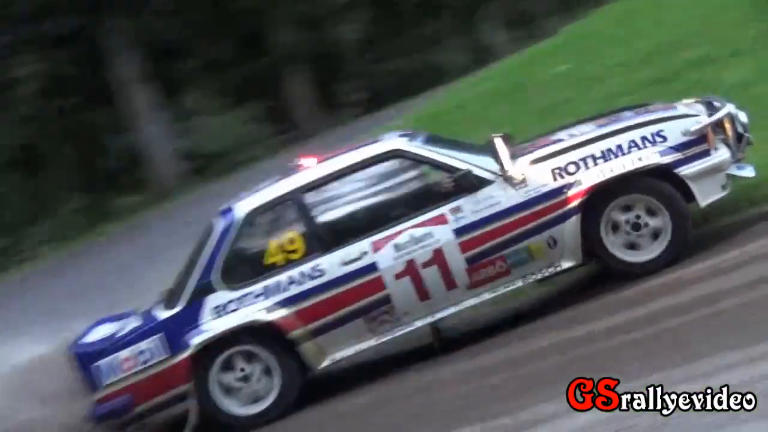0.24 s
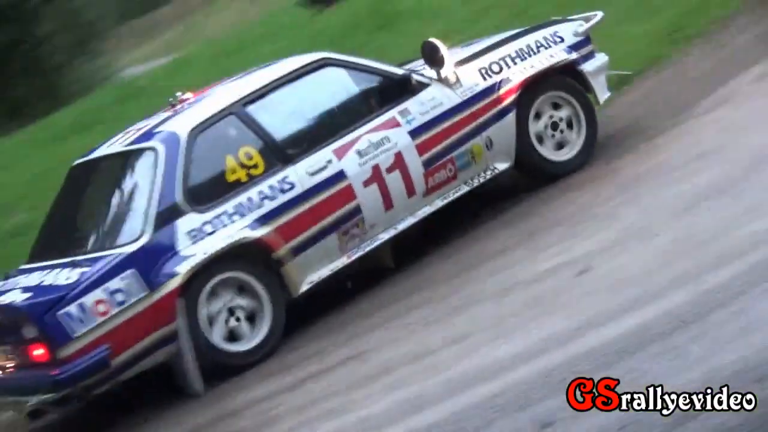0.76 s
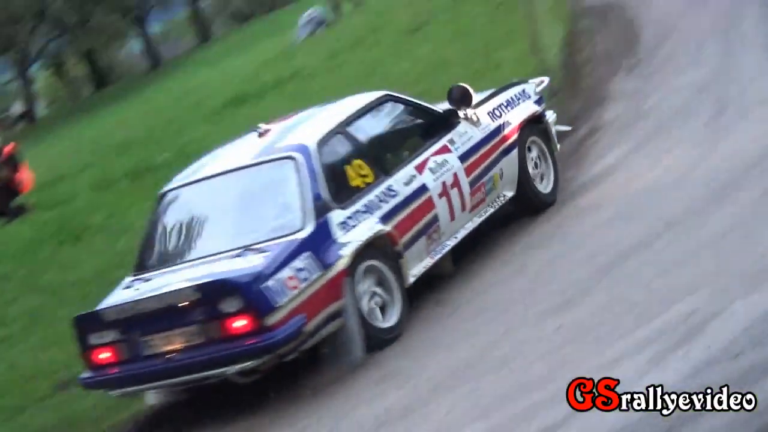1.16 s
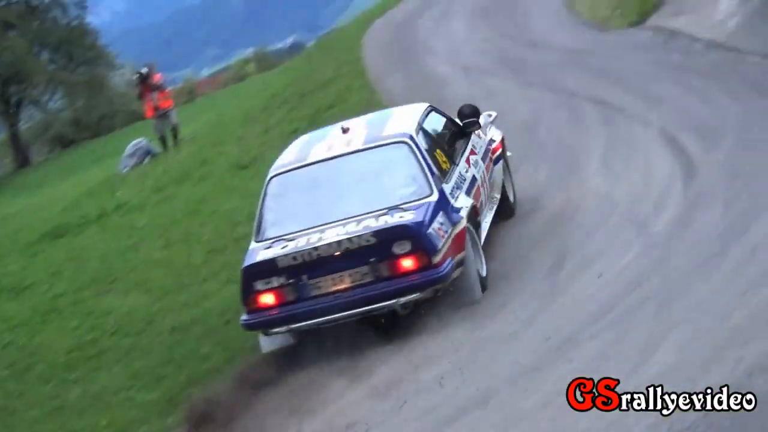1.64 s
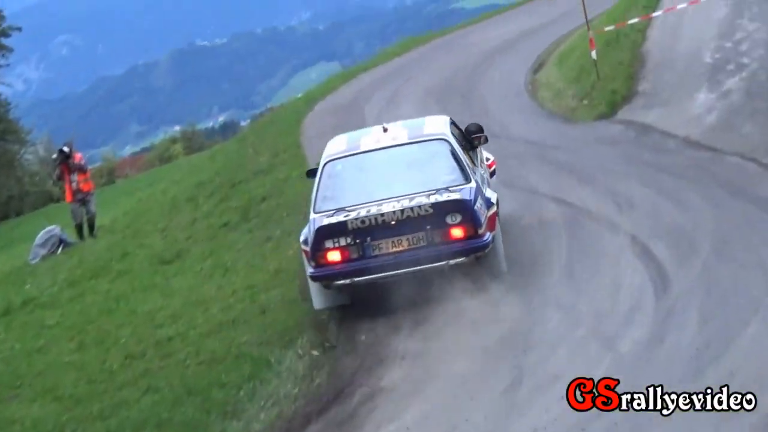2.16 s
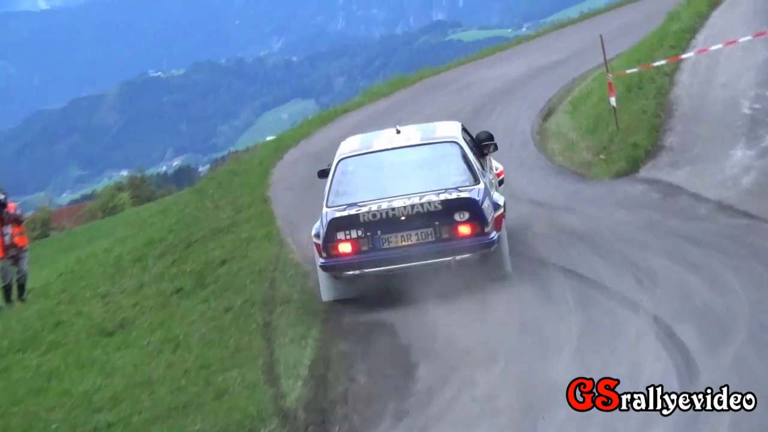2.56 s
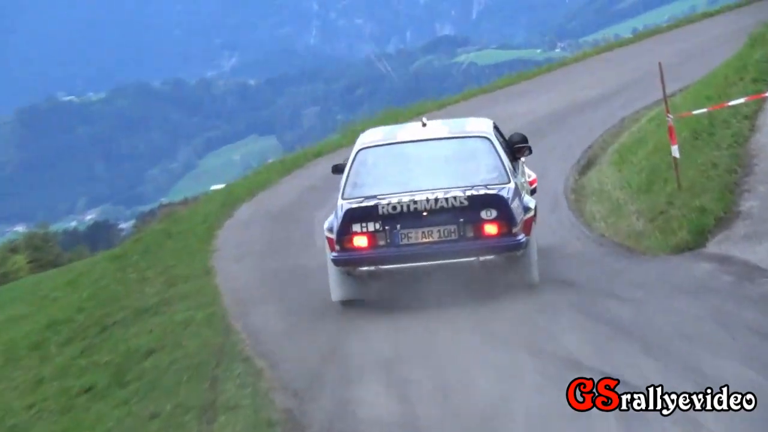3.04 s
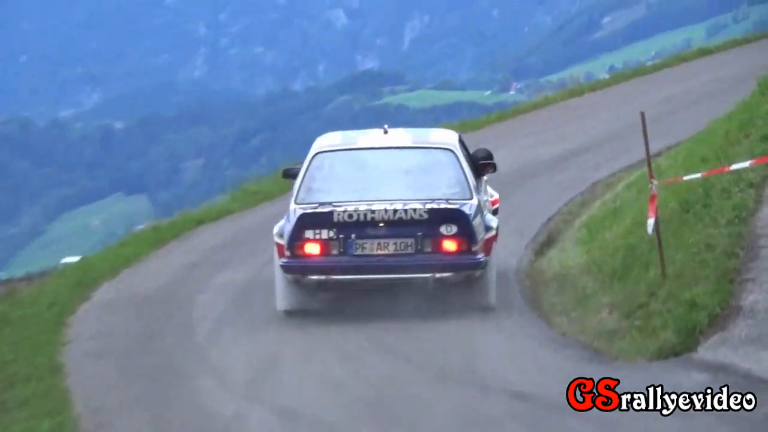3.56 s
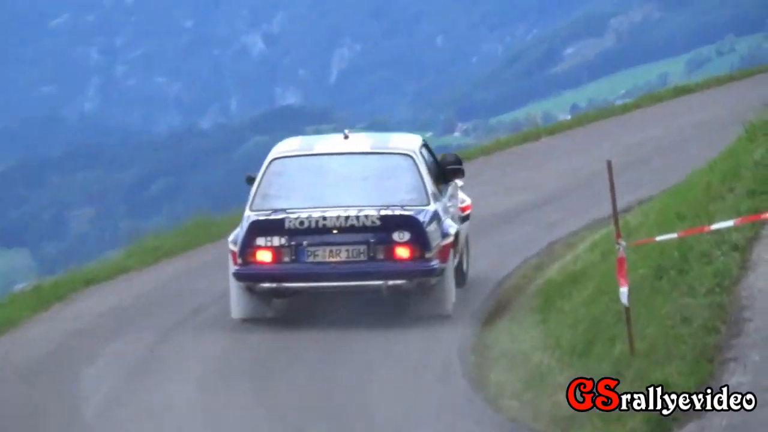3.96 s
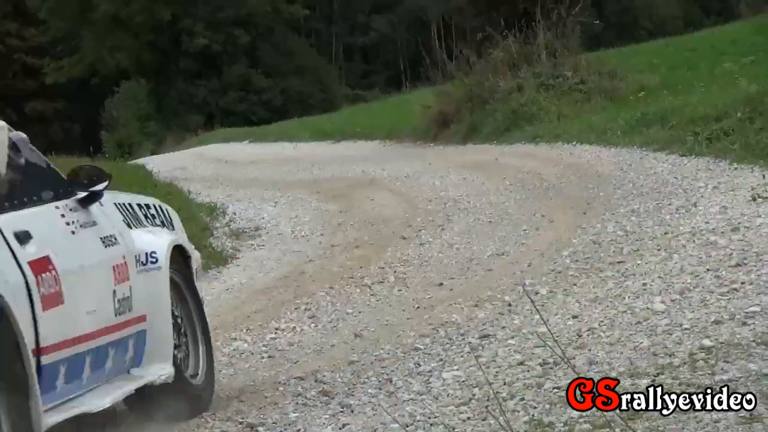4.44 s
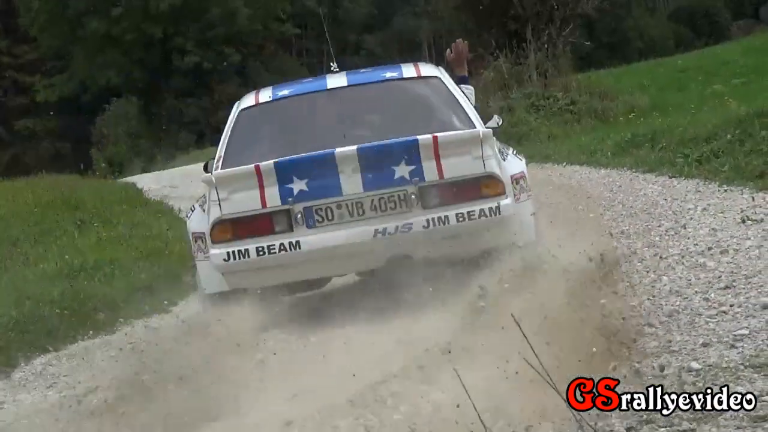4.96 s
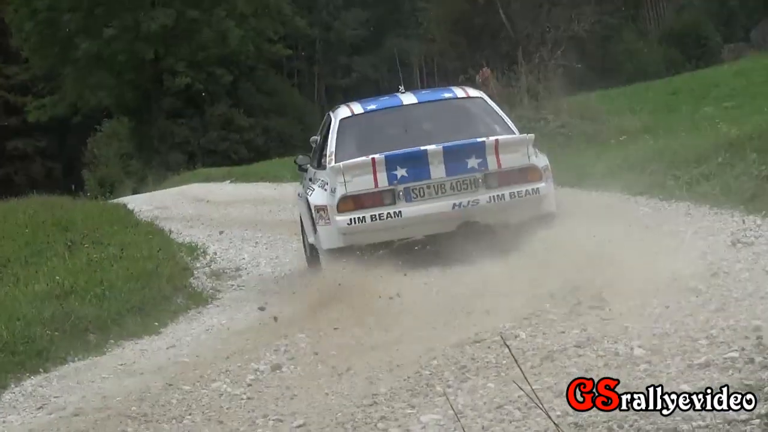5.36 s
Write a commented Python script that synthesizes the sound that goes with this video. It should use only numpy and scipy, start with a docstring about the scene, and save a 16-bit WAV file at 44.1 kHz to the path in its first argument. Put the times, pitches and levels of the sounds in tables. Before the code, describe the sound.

Outdoors, close to the roadside. From 0 s a four-cylinder rally engine at full load blares past, raspy and uneven, over dusty tyre scrub. Its pitch dips early, climbs until about 0.5 s, then drops in a brief throttle stumble with a thump near 0.6 s. Tyre hiss swells around 1.2 s; small stones tick. Revs flare near 1.5 s and sag by 2 s as the car turns away, the hiss thinning. From 1.9 to 3 s the exhaust stutters with dense, dull pops and bangs. Then the note climbs steadily, buzzing with a slight lope around 4 s, and fades almost away by 4.5 s. A hard cut at 4.52 s: a second engine, close, its revs falling until 4.8 s amid bright stone ticks and gritty spray. Heavy thumps at 4.8-4.9 s, then a smooth, strong hum surges upward until 5.4 s, easing with final pops by 5.6 s.

```python
"""Two four-cylinder rally engines at full chat, close to a microphone at the roadside. The first car slides out of a
tarmac hairpin, tyres scrubbing, stumbles and pulls away until it fades; after a hard cut a second powers out
of a gravel bend and sprays stones. Engines are sums of orders that vary firing by firing, with noise for the roar
in the pipe and the gas rasp. Bangs and thumps ring the pipe, grains of noise make the tyres, ticks make the stones;
the verge returns a faint echo and low noise makes the rumble."""
import sys
import numpy as np
from scipy import signal
from scipy.fft import rfft, irfft
from scipy.io import wavfile
from scipy.ndimage import uniform_filter1d

SR = 44100
rng = np.random.default_rng(int(sys.argv[2]) if len(sys.argv) > 2 else 0)


def wrap_up_sound(samples):
    """Save the sound to the file named by the first command line argument, as 16-bit audio."""
    columns = np.atleast_2d(samples).T
    # keep every value between -1 and 1, then stretch to whole-number steps
    tamed = np.clip(columns, -1, 1)
    steps = np.round(tamed * 32767).astype(np.int16)
    wavfile.write(sys.argv[1], SR, steps)


N = 246959
CUT_S = 4.517

# Bangs and thumps of the engine, most with a dip just before: t/s, bang level/dB, thump level/dB,
# engine dip/dB (values above 0 count as 0)
BANGS = [(0.615, -43, -11.5, 1.5), (1.496, -24, -14, -3), (1.579, -28, -44, 0), (1.872, -27.5, -37, -8),
         (1.910, -29, -27, -3.5), (2.189, -25.5, -11, -10), (2.228, -53, -40, -16.5), (2.273, -41, -32, -8),
         (2.35, -38, -26, -2.5), (2.439, -42.5, -35, -4.5), (2.498, -35.5, -40, -11.5),
         (2.586, -30.5, -38, -2), (2.631, -31.5, -21, -13), (2.672, -53, -31, -4.5), (2.72, -42, -32, -3.5),
         (2.761, -33.5, -28, -8), (2.785, -33.5, -32, -5), (2.803, -29.5, -18, -5.5), (2.859, -44, -33, -3),
         (2.931, -43.5, -22, -4), (3.017, -34.5, -47, -2.5), (3.068, -34.5, -40, 0),
         (3.195, -38.5, -30.5, -7), (3.336, -43.5, -29, -1.5), (3.408, -46, -30, -4.5),
         (3.55, -38, -31, -2), (3.63, -40, -32, -2.5), (3.719, -30.5, -23.5, -3), (3.862, -44, -30, 0),
         (4.812, -59, -9, -1), (4.862, -59, -17, -1), (4.886, -53, -6, -5), (5.472, -35, -16.5, 0),
         (5.504, -53, -20, 0.5), (5.554, -29, -9.5, -4.5)]
# When each car is last side-on, close behind view, far behind view: t/s
TURNING_AWAY = {"tarmac": (1.24, 1.6, 3.38), "gravel": (4.66, 4.93, 5.64)}


def tarmac_car():
    """First car: a strong first order, and tyres that scrub on dusty tarmac."""
    # Engine: t/s, base order f/Hz, then level/dB of first order, second order, orders 3 and 4,
    # roar in the pipe, gas rasp, half orders
    engine = [(0.02, 124.8, -25, -42, -59, -28.5, -36, -46),
              (0.12, 111.5, -19, -44, -35.5, -25.5, -40, -42),
              (0.16, 108.4, -24, -31, -34.5, -31.5, -56, -24),
              (0.29, 128.4, -21, -28, -30.5, -31.5, -41.5, -37),
              (0.38, 131.3, -50, -20.5, -28.5, -30.5, -44.5, -41),
              (0.45, 133.5, -24, -31.5, -32, -30.5, -37.5, -20.5),
              (0.51, 136.2, -29, -24, -29, -31, -53, -41), (0.535, 135.5, -25, -31, -31, -32.5, -40, -35),
              (0.555, 132, -30, -50, -53, -32, -36, -42), (0.6, 124.0, -27, -50, -54, -30, -40, -44),
              (0.618, 114, -32, -39, -21.5, -30.5, -47, -35),
              (0.64, 114.9, -20.5, -34.5, -30, -32, -40, -18),
              (0.75, 124.6, -21.5, -31, -34.5, -34, -45, -39),
              (0.82, 125.4, -27.5, -35, -36.5, -33, -47, -54),
              (0.89, 124.6, -28, -34.5, -34, -36.5, -53, -37),
              (1.0, 128.3, -31.5, -28, -31.5, -30.5, -45, -27),
              (1.1, 119.8, -29.5, -30.5, -35, -32, -44, -27), (1.17, 119.8, -25, -29.5, -34, -37, -63, -36),
              (1.22, 123.3, -22.5, -48, -32, -28, -57, -47), (1.3, 121.3, -24.5, -36, -32, -38, -48, -21),
              (1.37, 115.6, -21.5, -38, -28, -32.5, -39.5, -19),
              (1.4, 119.9, -18, -37, -30, -33.5, -66, -56), (1.48, 135.7, -23, -23, -38, -35.5, -41.5, -22),
              (1.55, 139.6, -20.5, -26.5, -32.5, -38, -47, -30),
              (1.73, 134.4, -19.5, -27.5, -39, -38.5, -49.5, -35),
              (1.86, 121.5, -24, -24, -36.5, -39, -52, -24),
              (1.96, 116.3, -21.5, -38, -39.5, -44.5, -69, -31),
              (2.09, 122.9, -22, -27, -39.5, -44.5, -53, -30),
              (2.15, 122.5, -22, -22.5, -33.5, -39.5, -55, -32),
              (2.24, 122.0, -22.5, -35.5, -35.5, -39, -52, -18.5),
              (2.32, 118.7, -21.5, -29.5, -36, -40.5, -54, -27),
              (2.4, 120.4, -21.5, -28, -46, -42.5, -62, -27),
              (2.43, 121.3, -20.5, -26, -34.5, -41.5, -52.5, -29.5),
              (2.53, 121.0, -24, -25.5, -39, -41.5, -51, -25),
              (2.6, 122.5, -21.5, -25.5, -35.5, -41, -53, -28),
              (2.72, 126.0, -26, -22.5, -35.5, -38.5, -49, -27),
              (2.81, 123.7, -25, -24.5, -31.5, -38.5, -46, -23.5),
              (2.87, 127.7, -27.5, -22.5, -38.5, -39.5, -53.5, -29),
              (2.92, 130.0, -21.5, -26, -32.5, -35, -52, -27.5),
              (2.99, 128.3, -27, -21.5, -40, -42.5, -54, -25),
              (3.15, 133.6, -20.5, -26.5, -34.5, -38, -52, -31),
              (3.4, 139.8, -23, -27, -36, -40.5, -52, -27),
              (3.64, 147.6, -22, -27.5, -42.5, -44, -50.5, -26.5),
              (3.88, 155.7, -25.5, -21.5, -37.5, -45, -50.5, -23),
              (4.09, 163.3, -26, -24, -37, -38, -49.5, -23.5),
              (4.34, 173.2, -34.5, -31, -44.5, -47.5, -51, -30.5),
              (4.43, 178.5, -40, -35, -46, -52, -56.5, -37), (4.47, 180, -45.5, -39.5, -53, -58, -60, -47),
              (4.5, 181.1, -55, -55, -63, -77, -66, -60)]
    # What the exhaust does to orders 3 to 14: f/Hz, level/dB beside the car, close behind, far behind
    exhaust = [(317, 2.5, 4.5, 6), (392, 0.5, 6, 8.5), (465.5, -7, -5, 2.5), (499.7, 3, -0.5, -13),
               (544, -19, -1, -18), (611, -12, -11, -15.5), (692, -2, -31, 0.5), (760, -11.5, -7, -3),
               (817, -7, -6.5, -9), (875, -17.5, -10, -15), (968, -15, -4, -19), (1034, -24, -13.5, -31.5),
               (1110, -21.5, -14.5, -34.5), (1210, -21, -19.5, -31.5), (1370, -33, -23, -17.5),
               (1520, -48, -25.5, -28), (2180, -36, -30.5, -32.5)]
    # Half orders of unequal cylinders: order, relative level/dB
    uneven = [(.5, -19), (1.5, -14.5), (2.5, -7.5), (4.5, -22)]
    # Treble hiss, tyres at first, then a faint steady hiss: t/s, level/dB
    hiss_levels = [(0, -40.5), (.12, -39.5), (.25, -45), (1, -44), (1.1, -41.5), (1.19, -38.5), (1.24, -43),
                   (1.41, -42), (1.46, -51.5), (1.7, -51), (2, -55), (2.301, -62.5), (2.6, -76.5),
                   (4.3, -66), (4.5, -73.5)]
    # Rubber on dusty tarmac: f/Hz, relative level/dB per Hz
    scrub = [(100, -43), (170, 21.5), (450, 23), (900, 15), (1300, 9), (2000, 4.5), (3500, 1), (5900, -5),
             (7900, -0.5), (9600, 1), (12500, -7), (15500, -7), (17000, -17)]
    # Pipe modes: f/Hz, nominal width/Hz, relative level/dB
    pipe_modes = [(514, 200, 4), (786, 156, 8), (841, 260, 10.5), (1418, 220, 3.5)]
    # Scatter of firing strength: t/s, level/dB
    firing = [(0, 1.8), (.6, 1.5), (.75, 1.1), (1.2, 1.2), (1.32, 2.1), (1.5, 1.3), (1.8, 1.9), (2.1, 1.5),
              (2.25, 3.2), (2.42, 1.5), (2.65, 2.3), (2.8, 2.8), (3.1, 1.8), (3.3, 2), (3.55, 2.4),
              (3.8, 2.2), (3.95, .8), (4.5, .5)]
    return car(engine, TURNING_AWAY["tarmac"], exhaust, uneven, hiss_levels, scrub, pipe_modes, firing,
               odd_db=1.07, halves_db=-0.4, roar_db=-4.5, grit_db=2.5, patch_db=2.0,
               front_db=-8.5, behind_front_db=-3.0, behind_gas_db=0.0, count=1)


def gravel_car():
    """Second car: a strong second order, and tyres that fling stones."""
    # Engine: t/s, base order f/Hz, then level/dB of first order, second order, orders 3 and 4,
    # roar in the pipe, gas rasp, half orders
    engine = [(4.52, 121.5, -37, -23, -39.5, -40.5, -49, -31),
              (4.612, 110.6, -25.5, -26.5, -40.5, -46, -51.5, -44),
              (4.828, 91.85, -38, -29, -42, -53, -70, -27), (4.91, 96.37, -43, -23.5, -28, -46.5, -54, -23),
              (4.984, 105, -40.5, -20.5, -31, -49.5, -49.5, -28),
              (5.098, 117.7, -31, -16.5, -32.5, -49.5, -52, -30.5),
              (5.264, 128.3, -40.5, -16, -37, -57, -52, -31),
              (5.364, 132.5, -38, -16.5, -38, -50, -56, -31), (5.424, 132.1, -35, -19, -40, -57, -56, -27),
              (5.462, 127.6, -48, -18.5, -41, -53, -51.5, -25.5),
              (5.53, 123, -43, -18.5, -38, -50, -57, -21.5)]
    # What the exhaust does to orders 3 to 14: f/Hz, level/dB beside the car, close behind, far behind
    exhaust = [(293, 3, -8, 9), (407, 5, 6.5, 4), (545, -1, -0.5, -3), (648, -24, 12, 8.5),
               (770, -25, -5, -14), (880, -9, -6, -31), (960, -8, -18, -31), (1100, -21, -21, -33),
               (1400, -38, -12, -32), (1700, -35, -23, -33)]
    # Half orders of unequal cylinders: order, relative level/dB
    uneven = [(1.5, -1.5), (2.5, -4), (3.5, -10)]
    # Treble hiss of the tyres and their spray: t/s, level/dB
    hiss_levels = [(4.52, -42), (4.55, -38), (4.575, -48), (4.65, -41), (4.69, -41.5), (4.77, -43.5),
                   (4.79, -44), (4.81, -42.5), (4.87, -42), (4.925, -40), (4.945, -42), (5, -51.5),
                   (5.1, -50), (5.3, -57.5), (5.4, -50.5), (5.59, -53.5)]
    # Flung stones: f/Hz, relative level/dB per Hz
    spray = [(300, -36), (900, -12), (2500, -9), (4300, -5), (6000, -8), (8000, -0.5), (9600, 0.5),
             (11400, -1.5), (14000, -2.5), (15500, -8), (17000, -11)]
    # Pipe modes: f/Hz, nominal width/Hz, relative level/dB
    pipe_modes = [(617, 190, 9), (950, 200, 1), (1410, 230, -8)]
    # Scatter of firing strength: t/s, level/dB
    firing = [(4.52, .8), (4.75, .8), (4.85, 1.8), (4.95, .5), (5.4, .6), (5.5, 1.8)]
    return car(engine, TURNING_AWAY["gravel"], exhaust, uneven, hiss_levels, spray, pipe_modes, firing,
               odd_db=-7, halves_db=-4.5, roar_db=-2.5, grit_db=3, patch_db=4.5,
               front_db=-21, behind_front_db=-7, behind_gas_db=10.0, count=2)


def car(engine, turns_away_s, exhaust, uneven, hiss_levels, hiss_colour, pipe_modes, firing,
        odd_db, halves_db, roar_db, grit_db, patch_db, front_db, behind_front_db, behind_gas_db, count):
    """Engine orders, roar and rasp driven by uneven firings, plus hiss; count firings a base period."""
    # Left minus right: t/s, level/dB of first order, of the orders above it, of gas and hiss
    bearing = [(0.0, 6, 0.0, -0.5), (0.14, 1.5, -1.0, -0.5), (0.34, 3, -1.0, -0.5), (0.41, -3, -1.5, 0.5),
               (0.56, 5.5, 0.5, -1), (0.67, 2.0, 0.0, 0), (0.95, 4.5, 1.0, -0.5), (1.11, 3, 2.5, -0.5),
               (1.62, 1, -2.0, -1), (1.89, 0.5, -1.5, -2), (3.07, 2, -2.5, -3), (3.35, 2.5, -4.5, -3.5),
               (3.54, 2, -2.5, -1.5), (3.68, 4.5, -5.0, -3.5), (4.05, 1.5, -3.0, -0.5),
               (4.29, 0.5, -4.5, 2), (4.49, 5, -3.0, 0), (4.51, 7, 4.5, 3), (4.63, 1.5, 3.5, -1),
               (4.87, 2, 0.5, -0.5), (5.57, 1, -1.0, -1.0), (5.6, -1, -1.0, -2)]
    hz, first_db, second_db, low_db, pipe_db, rasp_db, half_db = columns(engine)
    first_pan_db, upper_pan_db, noise_pan_db = columns(bearing)
    scatter_db, = columns(firing)
    behind = np.interp(np.arange(N) / SR, turns_away_s, [0, .5, 1])
    late_per_db = .003  # scatter of firing time, in periods per dB of scatter in strength

    turns = np.cumsum(hz) / SR
    cycle = (turns + .5).astype(int)
    chance = rng.standard_normal((int(turns[-1]) + 2, 4))
    edge = int(SR / 500)
    # weak firings fall further than strong ones rise
    strength = np.minimum(chance[:, 0], .6)[cycle]
    size = uniform_filter1d(undb(scatter_db * strength), edge) * engine_dips()
    late = uniform_filter1d(late_per_db * scatter_db * chance[cycle, 1], edge)
    angle = 2 * np.pi * (turns - late)

    order_db = [first_db, second_db] + upper_order_levels(hz, low_db, pipe_db, exhaust, behind, odd_db)
    first, upper = order_lines(order_db, angle, size)
    halves = half_orders(uneven, half_db + halves_db, scatter_db, angle)

    since = (count * angle / (2 * np.pi)) % 1  # share of a firing period since the last firing
    front = -size * undb(2.0 * chance[cycle, 2]) * (np.diff(since, prepend=0) < -.5)
    puff = size * (.3 + np.exp(-since / .28))
    roar = pipe_roar(front, puff, undb(front_db + behind_front_db * behind), pipe_modes)
    gas = undb(pipe_db + roar_db + behind_gas_db * behind) * roar + undb(rasp_db) * gas_rasp(puff)
    noise = gas + tyre_hiss(hiss_levels, hiss_colour, grit_db, patch_db)

    sides = np.array([[.5], [-.5]])
    return (first * undb(sides * first_pan_db) + (upper + halves) * undb(sides * upper_pan_db)
            + noise * undb(sides * noise_pan_db))


def upper_order_levels(hz, low_db, pipe_db, exhaust, behind, odd_db):
    """Levels of orders 3 to 14, shaped by the exhaust as the view goes from beside to far behind."""
    # Clean upper orders against the roar: t/s, level/dB
    clean_lines = [(0, -9), (.2, -1), (.6, -1), (1, 2), (1.4, 0), (1.7, 3.5), (1.9, 0), (2.3, -1), (3, 0),
                   (3.6, 0), (4.4, 3.5), (4.52, 2), (4.65, -2), (4.9, 3), (5.2, -3.5), (5.6, 0.5)]
    upper_from = 5  # from this order up the lines rise and fall with the roar
    flutter_db, waver_db = 2, 1.8  # quick flutter of those orders, slower wander of every one here
    clean_db, = columns(clean_lines)
    shape_hz, *views_db = np.transpose(exhaust)
    shares = [np.clip(1 - 2 * abs(behind - view), 0, 1) for view in (0, .5, 1)]
    levels = []
    for k in range(3, 15):
        if k < upper_from:
            level_db = low_db
        else:
            level_db = pipe_db + clean_db + flutter_db * walk(30)
        shape_db = sum(share * np.interp(k * hz, shape_hz, db) for share, db in zip(shares, views_db))
        levels.append(level_db + shape_db + odd_db * (k % 2) + waver_db * walk(13))
    return levels


def order_lines(order_db, angle, size):
    """The first order and the sum of those above: cosines locked to the firings, each with its own lag."""
    # Phase lag of each order, from the first up (a dip, then an overshoot): angle/rad
    lags = [-.9, -.6, -.7, -.7, .8, 1.3, 1.8, 2.3, 2.8, 3.3, 3.8, 4.3, 4.8, 5.3]
    drift_rad = .35  # orders slip slowly against each other as the paths off road and bank change
    # a weak firing is also a blunt one: the higher orders lose more than the first
    first_size, upper_size = size ** 0.6, size ** 1.3
    lines = []
    for k, (db, lag) in enumerate(zip(order_db, lags)):
        strength = upper_size if k > 0 else first_size
        phase = (k + 1) * angle - lag + drift_rad * walk(5)
        lines.append(-np.sqrt(2) * strength * undb(db) * np.cos(phase))
    return lines[0], sum(lines[1:])


def half_orders(uneven, level_db, scatter_db, angle):
    """Half orders of unequal cylinders, and quarter orders of one weak cylinder in four."""
    # Quarter orders: order, relative level/dB
    quarters = [(0.748, -10.5), (1.249, -7.5), (1.75, 2), (2.248, 2.5), (2.75, -4.5), (3.75, -20),
                (4.25, -16), (4.75, -12)]
    # Quarter orders, which swell late in the first car's run, then fade: t/s, level/dB
    lope = [(3.5, -53), (3.68, -44), (3.78, -39.5), (3.95, -38.5), (4.15, -45.5), (4.35, -43), (4.5, -64),
            (4.52, -88)]
    waver_db = 3.5  # half and quarter orders come and go
    slip_rad = .8  # slip of half orders per dB of firing scatter: lines when even, a burble when rough
    quarter_db, = columns(lope)
    halves = 0
    for k, db in uneven:
        gain = undb(level_db + db + waver_db * walk(20))
        halves = halves + gain * np.cos(k * angle + k * k + slip_rad * scatter_db * walk(35))
    for k, db in quarters:
        gain = np.sqrt(2) * undb(quarter_db + db + waver_db * walk(18))
        halves = halves + gain * np.cos(k * angle)
    return halves


def pipe_roar(front, puff, front_gain, pipe_modes):
    """The sharp front of each firing and the turbulence behind it ring the upper pipe modes."""
    drive = front_gain * unit(front) + unit(puff * rng.standard_normal(N))
    # two passes through each mode steepen its skirts
    return unit(sum(undb(db) * ring(ring(drive, f, 0.88 * w), f, 0.88 * w) for f, w, db in pipe_modes))


def gas_rasp(puff):
    """Turbulent gas: coloured noise that swells with each puff."""
    # Gas rasp: f/Hz, relative level/dB per Hz
    rasp_colour = [(590, -43.5), (1000, 0), (2070, -8), (2750, -11), (3640, -19), (3970, -14.5),
                   (5060, -27.5), (6500, -40), (8450, -55), (14300, -120)]
    return colour(puff * undb(1.0 * walk(25)) * rng.standard_normal(N), rasp_colour)


def engine_dips():
    """Gain of the engine, which drops before most bangs and while the throttle is shut for a moment."""
    dip_s = .011  # length of the dip
    lift_s, lift_length_s, lift_db = 0.5, 0.1, -1.5
    dip_db = np.zeros(N)
    for s, *_, db in BANGS:
        dip_db[int((s - dip_s) * SR):int(s * SR)] = min(db, 0)
    dip_db[int(lift_s * SR):int((lift_s + lift_length_s) * SR)] += lift_db
    return undb(uniform_filter1d(dip_db, SR // 400))


def bangs_and_thumps():
    """Each row a thump and a bang that ring the pipe, and a bright spit of gas."""
    # Modes rung by a bang: f/Hz, width/Hz, relative level/dB
    bang_modes = [(720, 580, -7.5), (1430, 340, -8), (2600, 1800, -14.5)]
    # lowest pipe mode, second pipe mode: f/Hz, width/Hz, relative level/dB
    thump_modes = [(115, 70, 0), (330, 190, -4)]
    push_s = .003  # length of the push that rings the thump
    spit_db = -30  # spit of gas against the bang
    s, bang_db, thump_db, _ = np.transpose(BANGS)
    hits = np.zeros((2, N))
    hits[:, (s * SR).astype(int)] = -undb([thump_db, bang_db])
    half_push = int(push_s * SR / 2)
    push = uniform_filter1d(uniform_filter1d(hits[0], half_push), half_push)
    thump, bang = (sum(undb(db) * ring(hit, hz, width_hz) * SR / (2 * np.pi * width_hz)
                       for hz, width_hz, db in modes)
                   for hit, modes in [(push, thump_modes), (hits[1], bang_modes)])
    tail = signal.lfilter([1], [1, -np.exp(-1 / (0.028 * SR))], hits[1])
    tail = uniform_filter1d(tail, SR // 120)
    spit = unit(ring(ring(rng.standard_normal(N), 3900, 7000), 3900, 7000))
    return thump + bang + undb(spit_db) * tail * spit


def tyre_hiss(hiss_levels, hiss_colour, grit_db, patch_db):
    """Coloured grit in the middle, with a fainter part spread to the sides."""
    spread_db = -15  # the four wheels and their spray are wider than the engine
    hiss_db, = columns(hiss_levels)
    hiss, wide = (colour(grit(grit_db, patch_db), hiss_colour) for _ in range(2))
    wide = undb(spread_db) * (wide - ring(wide, 800, 4000)) * np.array([[1], [-1]])
    # the curve gives the level of the treble part
    return undb(hiss_db) * (hiss + wide) / np.std(ring(hiss, 8500, 10340))


def grit(grit_db, patch_db):
    """Tyres scrub in patches; grains of very unequal size, each size range partly on its own."""
    # Borders between the size ranges: f/Hz
    edges = [2000, 5500, 10000]
    tyre_swell_db = .6
    swell_db, shared = tyre_swell_db * walk(14), walk(45)
    band = np.searchsorted(edges, np.arange(N // 2 + 1) * SR / N)
    spectrum = 0
    for k in range(len(edges) + 1):
        noise = rng.standard_normal(N)
        sizes = np.minimum(rng.exponential(size=N // 40 + 1), 3).repeat(40)[:N]
        patches = .6 * shared + .8 * walk(45)
        grains = noise * undb(grit_db * sizes + swell_db + patch_db * patches)
        spectrum = spectrum + (band == k) * rfft(grains)
    return irfft(spectrum, N)


def stones():
    """Stones strike car or road: ticks that die in milliseconds, bright in their own tint, with a duller part."""
    # Strikes: t/s, relative level/dB, dull part against the bright part/dB
    strikes = [(0.1989, -39, -17), (0.249, -21, -17), (0.391, -35, -12), (0.5536, -33, -7),
               (0.6995, -30, -2), (1.0332, -26, 0), (1.1238, -21, -4), (1.1662, -26, -2), (1.242, -24, -11),
               (1.4072, -27, -13), (1.475, -35, -16), (1.49, -21.5, -8), (1.5748, -24.5, -20),
               (1.6504, -41, -8), (1.718, -31, -0.5), (1.7425, -35, -9), (1.87, -31, -12),
               (1.94, -31.5, -18), (1.9828, -30, -2), (2.0083, -36, -19), (2.0605, -35.5, 1),
               (2.3444, -34, -8.5), (4.5484, -21, -27), (4.583, -25, -24), (4.5892, -23, -25),
               (4.6289, -30, -22), (4.6414, -18.5, -30), (4.7008, -23, -17), (4.7114, -24, -27),
               (4.7383, -25, -29), (4.7534, -21, -27), (4.7658, -19, -23), (4.884, -22, -24),
               (4.9006, -27, -25), (4.9175, -21.5, -22), (5.0724, -30, -22), (5.0934, -31, -19),
               (5.352, -36, -9), (5.4012, -28.5, -6)]
    bright_hz, width_hz, dull_hz = 9500, 4500, 3200
    decay_s, level_db = 0.0018, -8
    s, peak_db, dull_db = np.transpose(strikes)
    tint_db = 4 * rng.standard_normal(len(s))  # each stone leans high or low
    hits = np.zeros((3, N))
    hits[:, (s * SR).astype(int)] = undb([peak_db - np.maximum(tint_db, 0),
                                          peak_db + np.minimum(tint_db, 0) - 3,
                                          peak_db + dull_db])
    fade = signal.lfilter([1], [1, -np.exp(-1 / (decay_s * SR))], hits)
    bright, brighter = (unit(ring(ring(rng.standard_normal(N), hz, width_hz), hz, width_hz))
                        for hz in (bright_hz, 1.47 * bright_hz))
    dull = unit(ring(rng.standard_normal(N), dull_hz, dull_hz))
    return undb(level_db) * (fade[0] * bright + fade[1] * brighter + fade[2] * dull)


def verge_echo(cars):
    """Grass and bank return a dense, dying scatter of the shorter waves, different left and right."""
    bank_from_hz = 450
    scatter = rng.standard_normal((2, SR // 5)) * np.exp(-np.arange(SR // 5) / (0.038 * SR))
    scatter = signal.lfilter(*signal.butter(1, bank_from_hz, "high", fs=SR), scatter)
    return signal.fftconvolve(cars, scatter / np.sqrt(0.0095 * SR), axes=1)[:, :N]


def road_rumble():
    """Road and body rumble: slowly wavering low noise, mostly in the middle."""
    # Rumble: f/Hz, relative level/dB per Hz
    rumble_colour = [(15, -28.5), (25, 2.5), (50, -11), (80, 0), (110, 9), (150, -42.5)]
    # Rumble: t/s, level/dB
    rumble_levels = [(0, -41), (.7, -47), (1.7, -45), (2.1, -65), (2.8, -48), (3.7, -59), (4.4, -73),
                     (4.52, -51), (4.62, -65), (5.59, -47.5)]
    gain = undb(columns(rumble_levels)[0] + 1.2 * walk(2.8))
    middle, side = (gain * colour(rng.standard_normal(N), rumble_colour) for _ in range(2))
    return middle + .3 * side * np.array([[1], [-1]])


def undb(db):
    """Gain of a level in dB."""
    return 10 ** (np.asarray(db) / 20)


def unit(x):
    """Scale to rms 1."""
    return x / np.sqrt(np.mean(x ** 2))


def ring(x, hz, width_hz):
    """One resonance, gain 1 at the centre."""
    return signal.lfilter(*signal.iirpeak(hz, hz / width_hz, fs=SR), x)


def colour(x, points):
    """Shape a sound by a spectrum of (f/Hz, level/dB) points, then scale it to rms 1."""
    hz, db = np.transpose(points)
    f = np.arange(N // 2 + 1) * SR / N + 1
    gain = undb(np.interp(np.log(f), np.log(hz), db, left=-90, right=-90))
    return unit(irfft(rfft(x) * gain, N))


def walk(rate):
    """Random levels joined smoothly, rate a second."""
    k = int(SR / rate)
    return uniform_filter1d(np.repeat(rng.standard_normal(N // k + 1), k), k)[:N]


def columns(table):
    """Every column of a curve after the time, sample by sample."""
    s, *rest = np.transpose(table)
    return [np.interp(np.arange(N) / SR, s, c) for c in rest]


def scene():
    """First car until the cut, second car after it, with bangs, stones, the verge's echo and rumble."""
    low_cut_hz = 85  # the recorder cuts the bass of cars, tyres and stones below this
    t = np.arange(N) / SR
    until_cut = np.clip((CUT_S - t) / 0.0066, 0, 1)
    after_cut = np.clip((t - CUT_S) / 0.0015, 0, 1)
    cars = tarmac_car() * until_cut + bangs_and_thumps() + stones()
    cars = cars + after_cut * gravel_car()
    cars = cars + undb(-17.0) * verge_echo(cars)
    low_cut = signal.butter(3, low_cut_hz, "high", fs=SR, output="sos")
    return signal.sosfiltfilt(low_cut, cars) + road_rumble()


def record(dry):
    """The recorder rounds the loudest peaks and cuts the top."""
    top_hz = 15900
    rounded = np.tanh(1.612 * dry) / 1.493
    return signal.sosfilt(signal.ellip(10, .2, 80, top_hz, fs=SR, output="sos"), rounded)


dry = scene()
out = record(dry)
wrap_up_sound(out)
```